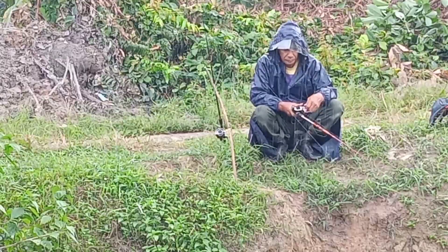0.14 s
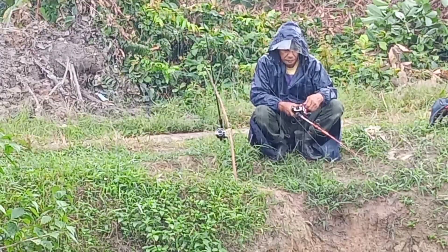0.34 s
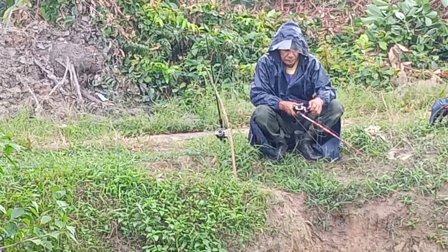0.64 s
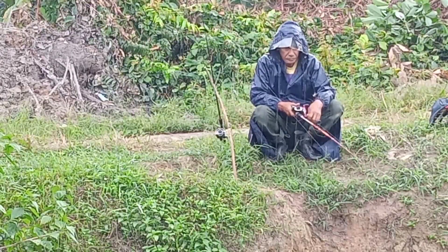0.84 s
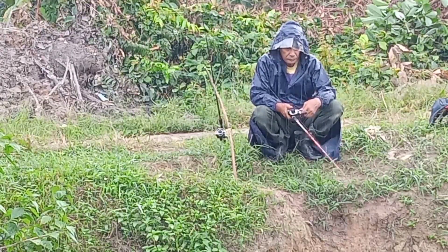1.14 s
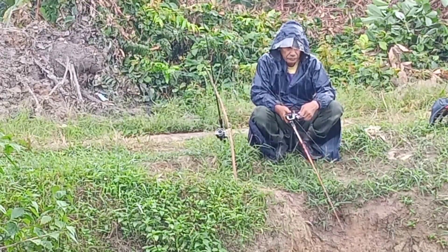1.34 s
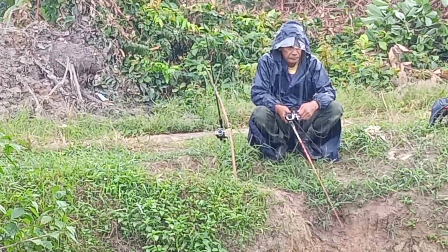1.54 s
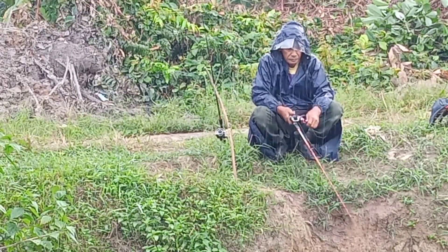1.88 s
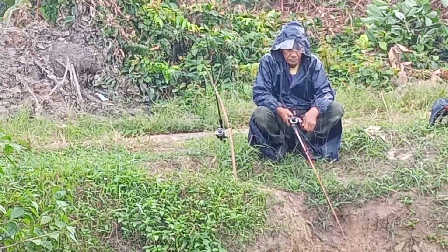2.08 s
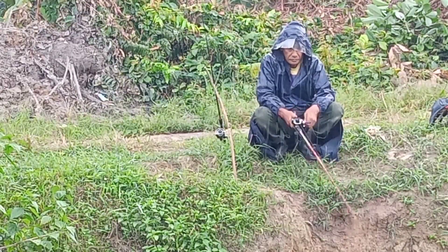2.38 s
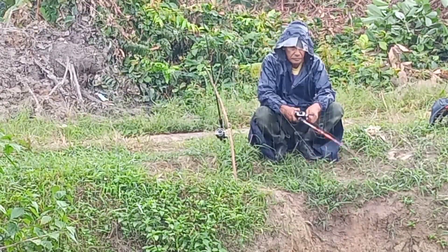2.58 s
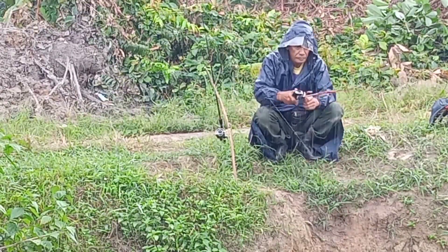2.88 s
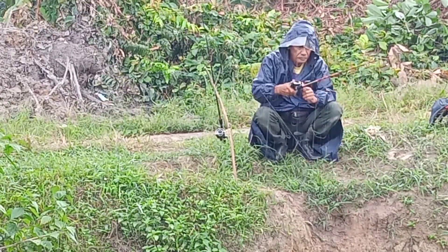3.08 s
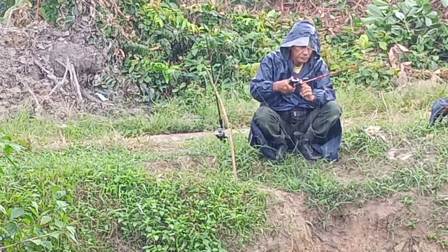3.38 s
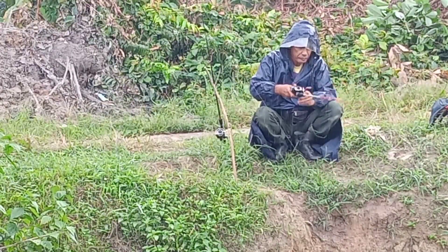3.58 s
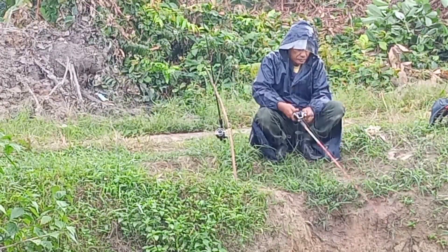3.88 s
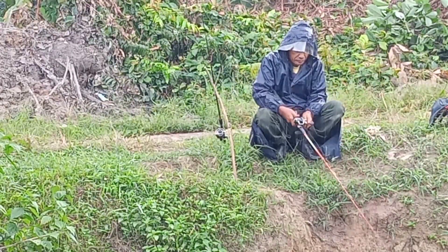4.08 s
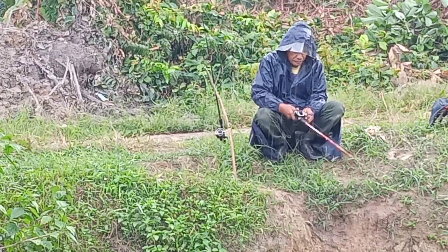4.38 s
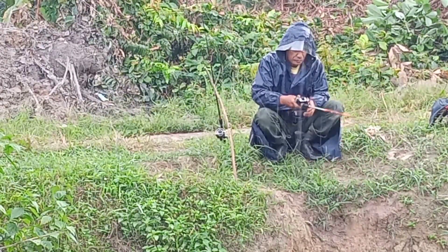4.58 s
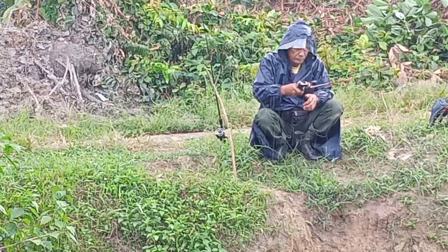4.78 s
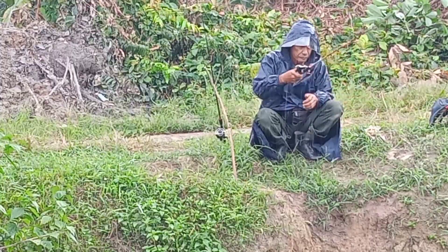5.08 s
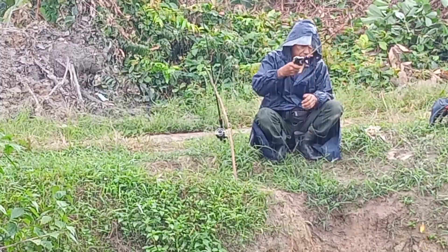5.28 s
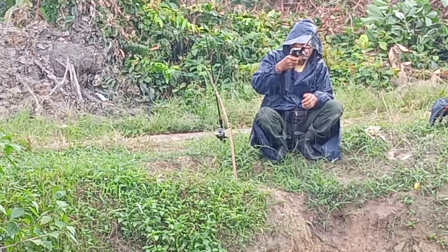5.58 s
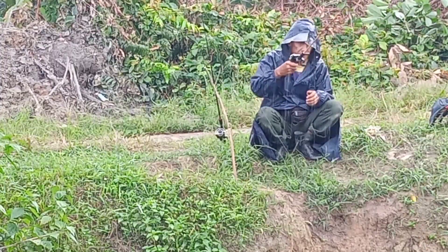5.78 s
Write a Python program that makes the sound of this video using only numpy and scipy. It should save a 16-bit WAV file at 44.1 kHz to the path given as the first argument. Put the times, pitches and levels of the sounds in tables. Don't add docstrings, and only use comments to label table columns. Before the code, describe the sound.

Close, covered phone microphone in open rain: a constant broad wash with crisp near splashes, watery puddle plinks and dry leaf ticks. Three large drops strike the cover, each louder than the last, the third a hard knock. Softer pats fall between them, over a barely audible wind rumble and distant engine drone.

```python
import sys
import numpy as np
from scipy import signal
from scipy.io import wavfile
from scipy.ndimage import uniform_filter1d

SR = 44100
rng = np.random.default_rng(int(sys.argv[2]) if len(sys.argv) > 2 else 0)


def generate_wav(sig):
    pcm = np.round(np.clip(np.atleast_2d(sig).T, -1, 1) * 32767).astype(np.int16)
    wavfile.write(sys.argv[1], SR, pcm)


def elevation(decibels):
    levels = np.asarray(decibels, float)
    return 10 ** (levels / 20)


N = 261954

# [t/s, level/dB]
RAINFALL_LEVEL = [
    (0, -41),
    (2.2, -42),
    (2.8, -42),
    (5.94, -41.5),
]
# [f/Hz, level/dB per Hz]
RAIN_COLOUR = [(60, -33), (150, -10.5), (220, -8), (400, -5), (700, -2.5), (1150, -1.5), (1600, -0.5),
               (2300, -1), (3000, -3.5), (3700, -6), (4300, -10.5), (5000, -16), (6400, -21.5),
               (22050, -22)]
# [t/s, peak level/dB, extra spray at the very top/dB]
NEAR_SPLASHES = [(0.2773, -36, -2), (0.3277, -38, 1), (0.4633, -33, -4), (0.4803, -29.5, -1),
                 (0.5237, -40, 0), (0.8594, -42, 1), (1.8193, -36, -3), (1.9574, -36, -1), (2.0797, -35, 1),
                 (2.184, -37, -3), (2.3925, -35, -4), (2.9926, -37.5, 4), (3.016, -35, -1),
                 (3.8716, -36, 0), (4.3236, -41, 3), (4.4638, -35, 0), (4.563, -32, 0), (4.7481, -40, -2),
                 (5.032, -40, 6), (5.1118, -38, -2), (5.2255, -38, -4), (5.4081, -36, -3), (5.5563, -42, 7),
                 (5.7543, -38, 9), (5.8296, -36, -1)]
# [t/s, peak level/dB, contact/ms, cover pitch f/Hz]
LARGE_DRIPS = [
    (.09692, -25.8, 2.91, 269),
    (2.51157, -18.9, 2.68, 259),
    (4.0445, -3.55, 1.89, 433),
]
# [t/s, peak level/dB, cover pitch f/Hz]
SMALL_DRIPS = [
    (0.464, -43, 170),
    (1.17, -47, 150),
    (1.818, -45, 150),
    (2.303, -49, 140),
    (2.779, -46, 150),
    (3.743, -45, 140),
    (3.882, -50, 170),
    (5.198, -59, 170),
]
# [t/s, peak level/dB, pitch f/Hz]
LEAF_TICKS = [
    (.0476, -36, 2000),
    (0.4707, -31, 3000),
    (.524, -41, 2500),
    (.6765, -30, 2600),
    (4.421, -45, 5000),
    (4.576, -36, 8000),
    (5.732, -34, 2600),
]
# [f/Hz, level/dB per Hz]
WIND_COLOUR = [(15, -50), (25, -32), (33, -26), (43, -11), (52, -6), (90, 1.5), (140, -4), (220, -13),
               (300, -28), (480, -100)]
# [f/Hz, gain/dB]
PORT_RESPONSE = [(6500, 0), (7000, 3), (7600, 4), (8180, 9.5), (8800, 3), (9300, 0), (9800, -5),
                 (10900, -7.5), (11400, -5), (12100, -9.5), (13000, -4.5), (13600, -7), (14300, -1),
                 (15500, 0.5)]

TREBLE_DB, TREBLE_FOLLOWS = -42.4, .5
STRAY_COUNT, STRAY_DB, STRAY_SPREAD_DB = 24, -51, 6
SPLASH_BODY_DB, BODY_FOLLOWS = -42, .4
CLOTH_Q, LIFT_PER_KHZ = .47, .775
PRE_LIFT_S = .004
SOFT_CYCLES = .86
SHUDDER_HZ, SHUDDER_LAG_S, SHUDDER_FADE_S = 105, .0045, .007
SHUDDER_DB, SHUDDER_FOLLOWS = -37, .35
PING_HZ, PING_CYCLES, PINGS_PER_S, PING_DB = 8170, 22, 150, -66.5
WIND_DB = -62.5
FLAP_S, FLAP_DB, FLAP_HZ, FLAP_LENGTH_S = 5.63, -54, 72, .1
ENGINE_START_S, ENGINE_END_S, ENGINE_RISE_S = 1.2, 4.8, .9
IDLE_HZ, PULL_HZ = 39, 45
ENGINE_DB, IDLE_DB, OCTAVE_DB = -72, -12, -5
OPEN_S, BLIP_S, GAP_S, SETTLE_S = .0069, .0014, .0036, .004
BLIP_DB, GAP_DB, RESUME_DB = -4, -17, -4
LIMIT = 1.25


def read(points, hz):
    f, value = np.transpose(points)
    return np.interp(np.log(hz + 1), np.log(f + 1), value)


def evened(x):
    return x / np.sqrt(np.mean(x ** 2) + 1e-20)


def add(mix, s, sound):
    part = mix[round(s * SR):][:len(sound)]
    part += sound[:len(part)]


def coloured(x, spectrum):
    hz = abs(np.fft.fftfreq(8192, 1 / SR))
    log_gain = np.maximum(read(spectrum, hz), -100) * np.log(10) / 20
    response = np.exp(np.conj(signal.hilbert(log_gain)))
    taps = np.fft.ifft(response).real[:4096]
    return signal.oaconvolve(x, taps)[:N]


def band(x, lo_hz, hi_hz):
    sos = signal.butter(2, [lo_hz, hi_hz], "bandpass", fs=SR, output="sos")
    return signal.sosfilt(sos, x)


def impacts(per_s, spread_db, most):
    size = elevation(spread_db * np.minimum(rng.exponential(1, N), most))
    return size * (rng.random(N) < per_s / SR)


def wash(patchy_db, gusty_db):
    frames = N // 64 + 5
    real, imag, patches = rng.standard_normal((frames, 129, 3)).T
    patches = uniform_filter1d(patches, size=8, axis=0)
    patches = evened(uniform_filter1d(patches, size=30, axis=1))
    gusts = evened(uniform_filter1d(rng.standard_normal(frames), size=40))
    cells = (real + 1j * imag) * elevation(patchy_db * patches + gusty_db * gusts)
    return evened(signal.istft(cells, nperseg=256, noverlap=192)[1][:N])


def drops(per_s, spread_db, fizz_ms):
    size = impacts(per_s, spread_db, 5)
    fade = np.exp(-np.arange(1500) / (fizz_ms * SR / 1000))
    power = signal.oaconvolve(size ** 2, fade ** 2)[:N]
    return evened(np.sqrt(abs(power)) * rng.standard_normal(N))


def leaves(per_s, spread_db, cycles, low_hz, count=24):
    size = impacts(per_s, spread_db, 4)
    which = rng.integers(0, count, N)
    t, out = np.arange(3000) / SR, np.zeros(N)
    for k, hz in enumerate(np.geomspace(low_hz, 15400, count)):
        ring = np.sin(2 * np.pi * hz * t) * np.exp(-t * hz / cycles)
        out += signal.oaconvolve(size * (which == k), ring * hz / 4000)[:N]
    return evened(out)


def rain():
    white = wash(patchy_db=1.0, gusty_db=.5)
    white += elevation(-6.0) * drops(per_s=600, spread_db=1.0, fizz_ms=2.2)
    white += elevation(-12.5) * leaves(per_s=1800, spread_db=2.5, cycles=3.1, low_hz=908)
    white += elevation(-7.5) * leaves(per_s=2500, spread_db=2.0, cycles=31.0, low_hz=400.7, count=40)
    spray = drops(per_s=110, spread_db=.5, fizz_ms=4.0)
    white += elevation(-2.5) * band(spray, 9500, 22000)
    sound = coloured(white, RAIN_COLOUR)

    s, db = np.transpose(RAINFALL_LEVEL)
    level_db = np.interp(np.arange(N) / SR, s, db)
    treble = signal.sosfiltfilt(signal.butter(2, 5000, "highpass", fs=SR, output="sos"), sound)
    body = (sound - treble) * elevation(level_db - .71)
    treble_gain = elevation(TREBLE_DB + TREBLE_FOLLOWS * (level_db - level_db.mean()))
    return (body + treble * treble_gain) / np.std(band(sound, 930, 6200))


def splashes():
    out, t = np.zeros(N), np.arange(600) / SR
    when, size, fine = rng.random((STRAY_COUNT, 3)).T
    stray_db = STRAY_DB + STRAY_SPREAD_DB * (2 * size - 1)
    strays = np.transpose([when * N / SR, stray_db, 4.0 * (fine - .5)])
    rows = [*NEAR_SPLASHES, *strays]
    envelope = np.exp(-t / .0018) * np.minimum(t / .00029, 1)
    bursts = rng.standard_normal((len(rows), 600)) * envelope
    for (s, db, fine_db), burst in zip(rows, bursts):
        top = elevation(db + fine_db + 2.0) * band(burst, 12600, 19000)
        middle = elevation(db - 2.0) * band(burst, 6100, 13000)
        body_db = SPLASH_BODY_DB + BODY_FOLLOWS * (db - SPLASH_BODY_DB)
        add(out, s, top + middle + elevation(body_db) * band(burst, 1400, 5900))
    return out


def drip(db, contact_ms, hz, q, lift):
    contacts = (np.arange(2000) / SR - PRE_LIFT_S) * 1000 / contact_ms
    push = np.sin(np.pi * np.clip(contacts, 0, 1)) ** 2.1
    early = lift * np.exp(-((contacts - .38) / .64) ** 2)
    cloth = signal.lfilter(*signal.iirpeak(hz, max(q, .3), SR), early - push)
    cloth = signal.lfilter(*signal.butter(2, 79, "highpass", fs=SR), cloth)
    return elevation(db) * cloth / abs(cloth).max()


def cover():
    out, t = np.zeros(N), np.arange(2600) / SR
    swing = -np.sin(2 * np.pi * SHUDDER_HZ * t) * np.exp(-t / SHUDDER_FADE_S)
    shudder = band(swing, 35, 260)
    for s, db, contact_ms, hz in LARGE_DRIPS:
        thump = drip(db, contact_ms, hz, CLOTH_Q, LIFT_PER_KHZ * hz / 1000)
        add(out, s - PRE_LIFT_S, thump)
        add(out, s + SHUDDER_LAG_S, elevation(SHUDDER_DB + SHUDDER_FOLLOWS * db) * shudder)
    for s, db, hz in SMALL_DRIPS:
        add(out, s - PRE_LIFT_S, drip(db + 1.0, SOFT_CYCLES * 1000 / hz, hz, 1.0, 0))
    return out


def ticks():
    out, t = np.zeros(N), np.arange(300) / SR
    for s, db, hz in LEAF_TICKS:
        add(out, s, elevation(db) * np.cos(2 * np.pi * hz * t) * np.exp(-t * hz / 1.6))
    return out


def pings():
    size = impacts(PINGS_PER_S, 3.0, 4)
    t = np.arange(800) / SR
    ring = np.sin(2 * np.pi * PING_HZ * t) * np.exp(-t * PING_HZ / PING_CYCLES)
    level = elevation(PING_DB) / elevation(read(PORT_RESPONSE, PING_HZ))
    return level * evened(signal.oaconvolve(size, ring)[:N])


def wind():
    lumps = elevation(1.5 * evened(uniform_filter1d(rng.standard_normal(N), size=2500)))
    return elevation(WIND_DB) * evened(coloured(lumps * rng.standard_normal(N), WIND_COLOUR))


def flap():
    out, t = np.zeros(N), np.arange(0, FLAP_LENGTH_S, 1 / SR)
    swell = np.sin(np.pi * t / FLAP_LENGTH_S) ** 2
    add(out, FLAP_S, elevation(FLAP_DB) * np.sin(2 * np.pi * FLAP_HZ * t) * swell)
    return out


def engine():
    t = np.arange(N) / SR
    inside_s = np.minimum(t - ENGINE_START_S, ENGINE_END_S - t)
    throttle = np.clip(inside_s / ENGINE_RISE_S, 0, 1)
    waver = evened(uniform_filter1d(rng.standard_normal(N), size=9000))
    hz = IDLE_HZ + (PULL_HZ - IDLE_HZ) * throttle + .24 * waver
    turn = 2 * np.pi * np.cumsum(hz) / SR
    level = elevation(ENGINE_DB + IDLE_DB * (1 - throttle) + 1.2 * waver) * np.minimum(4 * throttle, 1)
    return level * np.sqrt(2) * (np.sin(turn) + elevation(OCTAVE_DB) * np.sin(2 * turn))


def scene():
    near = splashes() + cover() + ticks() + pings()
    far = wind() + flap() + engine()
    return (rain() + near + far)[None]


def top_cut(x):
    return signal.sosfilt(signal.butter(12, 15430, fs=SR, output="sos"), x)


def record(dry):
    t = np.arange(N) / SR - OPEN_S
    fade_db = RESUME_DB * np.clip(1 - (t - BLIP_S - GAP_S) / SETTLE_S, 0, 1)
    gain_db = np.select([t < BLIP_S, t < BLIP_S + GAP_S], [BLIP_DB, GAP_DB], fade_db)
    gain = uniform_filter1d(elevation(gain_db) * (t > 0), size=20)
    heard = coloured(dry[0], PORT_RESPONSE)[None] * gain
    heard = LIMIT * np.tanh(heard / LIMIT)
    low_pass = signal.firwin(601, 15560, window=("kaiser", 9), fs=SR)
    heard = signal.oaconvolve(heard, low_pass[None], "same")
    return top_cut(heard)


dry = scene()
out = record(dry)
generate_wav(out)
```